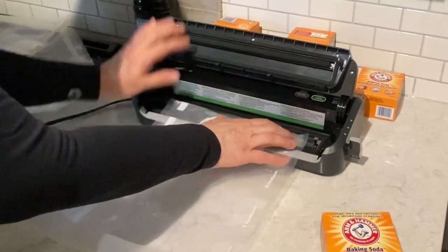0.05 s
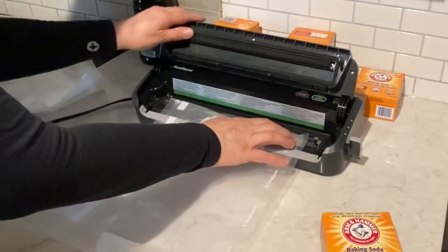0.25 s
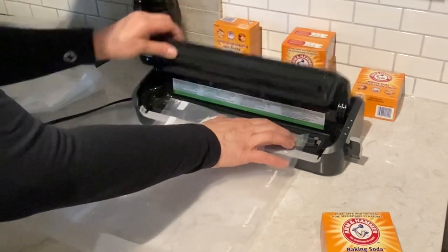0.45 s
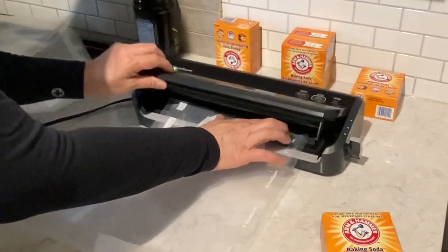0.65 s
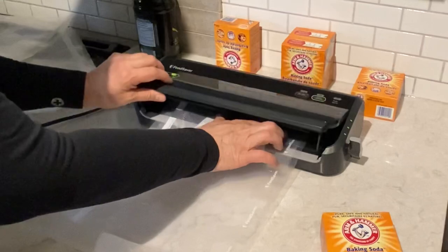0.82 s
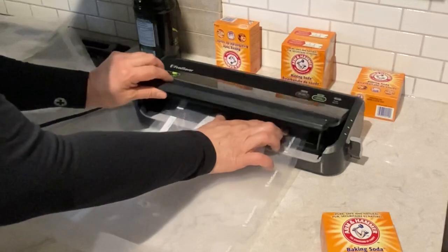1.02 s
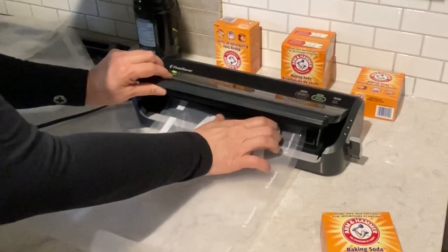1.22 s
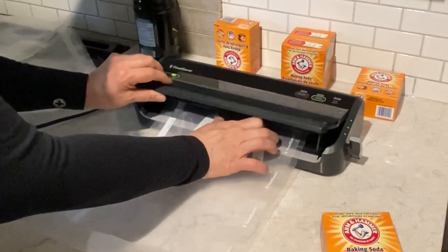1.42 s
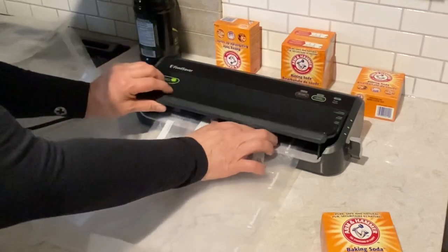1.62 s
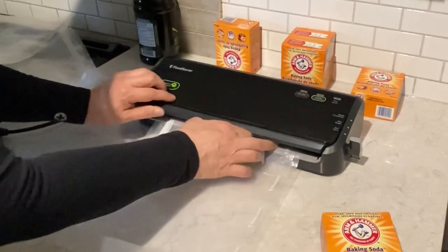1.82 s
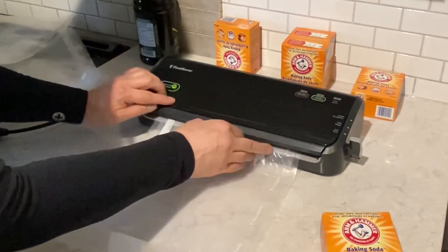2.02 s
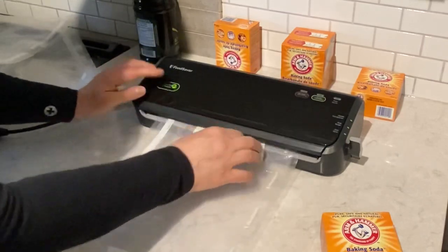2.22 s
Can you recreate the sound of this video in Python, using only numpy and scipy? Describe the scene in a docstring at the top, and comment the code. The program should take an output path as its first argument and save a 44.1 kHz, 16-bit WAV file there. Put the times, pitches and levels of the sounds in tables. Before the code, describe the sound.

A vacuum sealer's plastic lid clatters loose, clicks as it is lowered, then is pressed shut with hollow knocks and scrapes. A plastic bag rustles faintly. Heard close up in a small kitchen with a low appliance hum.

```python
"""A sharp plastic click, then a clatter: a hand knocks loose the open lid of a vacuum sealer.
The lid is lowered, the latches clack, and it is pressed home with scrapes and hollow shell knocks.
Its weight thuds in the housing and booms in the kitchen counter; a plastic bag rustles under the fingers.
An appliance hums in the small tiled room. Two close microphone ports pick it all up."""
import sys
import numpy as np
from scipy import signal
from scipy.fft import rfft, irfft, next_fast_len
from scipy.io import wavfile
from scipy.ndimage import map_coordinates

SR = 44100
rng = np.random.default_rng(int(sys.argv[2]) if len(sys.argv) > 2 else 0)


def wrap_up_sound(samples):
    """Save the sound to the file named by the first command line argument, as 16-bit audio."""
    columns = np.atleast_2d(samples).T
    # keep every value between -1 and 1, then stretch to whole-number steps
    tamed = np.clip(columns, -1, 1)
    steps = np.round(tamed * 32767).astype(np.int16)
    wavfile.write(sys.argv[1], SR, steps)


N = 103635

HUM_PARTIALS = [(119, -56.5), (236, -52), (359.8, -47)]  # appliance: f/Hz, level/dB
AIR_SPECTRUM = [(20, -61), (45, 5.5), (70, 2), (110, 3), (155, -3.5), (220, 6), (300, -7), (450, -11),
                (800, -15), (1500, -24), (3000, -36), (6000, -43), (15000, -48)]  # room noise: f/Hz, level/dB
ROOM_DECAY = [(100, 0.6), (500, 0.25), (2500, 0.26), (7000, 0.19), (14000, 0.13)]  # reverberation: f/Hz, T60/s
ROOM_SPECTRUM = [(60, -11), (250, -4), (700, -1.5), (2500, -1.5), (7000, -4), (14000, -5.5)]  # tail re direct sound: f/Hz, level/dB
ROOM_COHERENCE = [(70, 0.91), (250, 0.81), (500, 0.031), (4000, 0.049), (6500, 0.94), (9000, 1)]  # diffuse sound, left-right: f/Hz, coherence/1
DIRECT_COHERENCE = [(70, 0.97), (250, 0.88), (1000, 1), (3000, 0.66), (6000, 0), (9000, 0.99)]  # direct sound, left-right: f/Hz, coherence/1
PORT_LEAD = [(4500, 0), (5500, -1), (6900, .5), (8300, 2.7), (9200, 3.14), (10100, 3.5), (11500, 6),
             (13200, 6.5), (14900, 9.3)]  # left port ahead of right: f/Hz, phase/rad

SHUDDER_SWELLS = [(.26, 0.033, -28), (.38, 0.076, -42), (2.04, 0.14, -37.5)]  # counter rumble: centre t/s, half width/s, level/dB
SHUDDER_SPECTRUM = [(20, -9), (45, 11.5), (72, -7), (110, -38), (250, -41.5)]  # counter rumble: f/Hz, level/dB
RUSTLE_ENVELOPE = [(.14, -72.5), (.19, -47.5), (.3, -73), (0.471, -74), (0.5, -42), (0.6, -96), (.96, -70),
                   (1.08, -64.5), (1.389, -60.5), (1.46, -51.5), (1.56, -44), (1.689, -53), (1.789, -45.5),
                   (1.92, -44), (2.0, -55.5), (2.089, -41.5), (2.199, -66.5), (2.24, -58), (2.35, -57)]  # bag handling: t/s, level/dB
CREASE_SNAPS = [(1.072, -41), (1.145, -48), (1.171, -34), (1.1967, -24.5), (1.2209, -35), (2.096, -29.5)]  # creases flipping: t/s, level/dB
FILM_SPECTRUM = [(500, -46), (2000, 8), (5000, 3.5), (8000, 4.5), (12000, 3), (15000, 3)]  # bag film: f/Hz, level/dB
SCRAPE_SWELLS = [(0.175, 0.011, -35), (0.222, 0.021, -34), (0.258, 0.011, -34), (0.363, 0.1, -52.5),
                 (.478, 0.0044, -43), (.51, 0.021, -40), (0.93, 0.04, -56.5), (1.1, 0.0094, -38.5),
                 (1.2, 0.026, -40.5), (1.45, 0.016, -36.5), (1.559, 0.069, -41.5), (1.635, 0.02, -41.5),
                 (1.785, 0.054, -31), (1.893, 0.022, -38.5), (1.929, 0.0052, -30), (2.081, 0.046, -42),
                 (2.147, 0.02, -44)]  # sliding strokes: centre t/s, half width/s, level/dB
SCRAPE_SPECTRUM = [(200, -2.5), (450, 3), (720, 7), (1000, 1.5), (1500, -4.5), (2200, -12), (5000, -26),
                   (15000, -37)]  # rubbed hollow plastic: f/Hz, level/dB

LANDINGS = [(.204, -15.5, -18), (0.227, -25, -24.5), (0.2843, -20.5, -12.5), (0.623, -50, -24.5),
            (0.844, -36, -29), (1.432, -36.5, -22.5), (1.724, -32, -19), (1.803, -27, -14.5),
            (1.938, -28.5, -18)]  # weight on the machine: t/s, counter level/dB, housing level/dB
COUNTER_MODES = [(47.73, -13, 1), (67.4, -3, 0.44), (114, 1.5, 0.21)]  # counter boom: f/Hz, level/dB, T60/s
HOUSING_MODES = [(218, -3, 0.076), (224.8, -4, 0.13), (276.3, -12, 0.19), (347.4, -1, 0.05),
                 (515, -6.5, 0.04)]  # housing thud: f/Hz, level/dB, T60/s
SHELL_HITS = [(.202, .005, -17, 635), (.229, 0.0012, -23.5, 543), (.282, 0.0019, -21, 504),
              (.305, 0.0015, -25, 544), (.618, 0.002, -37, 694), (.911, 0.00083, -40, 780),
              (1.0127, 0.00052, -18.5, 763), (1.744, 0.0056, -19, 550), (1.784, 0.0046, -13.5, 620),
              (1.856, 0.0032, -23, 710), (1.9338, 0.0014, -11.5, 578), (2.058, 0.0012, -26, 647)]  # hollow knocks: t/s, rise/s, level/dB, pitch f/Hz
SHELL_MODES = [(508, -1), (560, -2.5), (610, 4.5), (690, 2), (745, -0.5), (835, -1.5), (1075, -2)]  # plastic shell: f/Hz, level/dB
# lid hitting base: t/s, rise/s, latch level/dB, crack level/dB, crack cutoff f/Hz, latch pitch f/Hz
LID_CONTACTS = [ (0.0118, 0.0003, -34, -32, 7600, 1240), (.208, 0.0072, -26.5, -26, 3130, 2650),
                (.231, 0.0026, -28, -27, 2200, 2190), (.281, 0.00087, -24.5, -17, 5040, 1700),
                (.305, 0.00199, -27.5, -24, 5800, 2380), (0.532, 0.0013, -42.5, -38.5, 6970, 2240),
                (.618, 0.0012, -45, -40.5, 2600, 3000), (0.838, 0.0011, -52, -60, 4000, 3170),
                (0.854, 0.00063, -44.5, -65, 4030, 2660), (0.9886, 0.0013, -31, -33.5, 7800, 2070),
                (1.0118, 0.00068, -24, -20, 7900, 1190), (1.238, 0.00066, -18.5, -19.5, 13500, 2520),
                (1.4281, 0.0009, -52, -33.5, 2480, 2000), (1.6185, 0.00085, -24.5, -40, 2200, 1460),
                (1.7182, 0.00072, -29, -26.5, 3000, 1290), (1.764, 0.0018, -41, -30.5, 3200, 1400),
                (1.785, 0.0054, -35, -25, 5030, 1700), (1.794, 0.0017, -19, -20, 6050, 1410),
                (1.861, 0.0027, -22.5, -25, 3760, 1600), (1.934, 0.0012, -22.5, -24.5, 6700, 1680),
                (2.058, 0.00079, -36, -43, 3020, 1420)]
LATCH_MODES = [(1110, 8.5), (1310, 0.5), (1480, 1.5), (1700, 0), (1950, -4), (2340, -4.5), (2650, -1.5),
               (2910, -8.5), (3450, -7), (4610, -7.5), (7100, -14)]  # plastic latch: f/Hz, level/dB
CRACK_SPECTRUM = [(50, -35), (500, 5.5), (1500, -3), (3500, -4.5), (7000, -4.5), (14000, -1)]  # contact noise: f/Hz, level/dB


def amp(db):
    """Decibels to gain."""
    return 10 ** (np.asarray(db) / 20)


def unit(x):
    """Scale to rms 1."""
    return x / np.sqrt(np.mean(x ** 2) + 1e-20)


def along(points, hz):
    """Interpolate (f/Hz, value) points on a log axis."""
    f, v = np.transpose(points)
    return np.interp(np.log(hz + 1), np.log(f + 1), v)


def wobble(knots_per_s):
    """Smooth random curve."""
    knots = rng.standard_normal(int(N * knots_per_s / SR) + 4)
    return map_coordinates(knots, [np.arange(N) * knots_per_s / SR])


def swells(rows):
    """Gain curve of Gaussian bumps."""
    t = np.arange(N) / SR
    return sum(amp(db) * np.exp(-((t - centre_s) / half_s) ** 2) for centre_s, half_s, db in rows)


def filtered(x, response):
    """Apply a frequency response."""
    n = x.shape[-1]
    padded = next_fast_len(n + 8192)
    return irfft(rfft(x, padded) * response(np.fft.rfftfreq(padded, 1 / SR)), padded)[..., :n]


def coloured(x, spectrum):
    """Shape by a spectrum, at rms 1."""
    return unit(filtered(x, lambda hz: amp(along(spectrum, hz))))


def spread(pair, coherence):
    """Mix two unrelated signals to left and right of given coherence."""
    angle = lambda hz: np.arccos(np.clip(along(coherence, hz), -1, 1)) / 2
    mid, side = filtered(pair, lambda hz: np.array([np.cos(angle(hz)), np.sin(angle(hz))]))
    return np.array([mid + side, mid - side])


def add(track, at_s, sound):
    """Mix a sound in, cropped to the track."""
    start = round(at_s * SR)
    part = track[:, max(start, 0):max(start + sound.shape[1], 0)]
    part += sound[:, max(-start, 0):][:, :part.shape[1]]


def grains(per_s, scatter_db):
    """Random impulses of uneven size: tiny slips."""
    chance, size = rng.random(N), rng.standard_normal(N)
    return (chance < per_s / SR) * amp(scatter_db * np.minimum(size, 2)) * rng.choice([-1, 1], (2, N))


def struck(modes, pitch_hz, db_per_octave, t60_s):
    """Modes far from the struck pitch ring less."""
    return [(hz, db - db_per_octave * abs(np.log2(hz / pitch_hz)), t60_s) for hz, db in modes]


def ring(modes, t, rise_s, blur_hz, scatter_db=1):
    """Damped, wavering modes, in phase at t = 0; returns a quadrature pair."""
    hz, db, t60_s = np.transpose(modes)[:, :, None]
    age_s = np.maximum(t, 0)
    steps = rng.standard_normal((len(hz), len(t))) * (t > 0)
    phase = 2 * np.pi * hz * age_s + np.cumsum(steps, axis=1) * np.sqrt(2 * np.pi * blur_hz / SR)
    gain = amp(db + scatter_db * rng.standard_normal(db.shape)) / np.sqrt(np.sum(amp(db) ** 2) / 2)
    ringing = np.sum(gain * np.exp(1j * phase - np.log(1000) * age_s / t60_s), axis=0)
    return np.array([ringing.imag, ringing.real]) * (1 - np.exp(-age_s / rise_s))


def room_air(level_db=-45):
    """Low, diffuse noise of the still kitchen."""
    return amp(level_db) * spread(coloured(rng.standard_normal((2, N)), AIR_SPECTRUM), ROOM_COHERENCE)


def appliance_hum():
    """Hum partials drifting in phase, slightly louder on the right."""
    t = np.arange(N) / SR
    hum = sum(np.sqrt(2) * amp(db) * np.sin(2 * np.pi * hz * t + wobble(5.32)) for hz, db in HUM_PARTIALS)
    return hum * amp([[-1], [1]])


def room_tail(x, build_s=0.0013, block=SR // 5):
    """Tile reflections: a short noise tail, new for each block."""
    out = np.zeros((2, N))
    for start in range(0, N, block):
        hz, t, noise = signal.stft(rng.standard_normal((2, SR // 2)), SR, nperseg=256)
        decay = np.exp(-np.log(1000) * t / along(ROOM_DECAY, hz)[:, None]) * (1 - np.exp(-t / build_s))
        decay /= np.linalg.norm(decay, axis=1, keepdims=True)
        tail = signal.istft(noise * decay, SR, nperseg=256)[1]
        tail /= np.linalg.norm(tail[0])
        add(out, start / SR, signal.fftconvolve(x[None, start:start + block], tail, axes=1))
    return spread(filtered(out, lambda hz: amp(along(ROOM_SPECTRUM, hz))), ROOM_COHERENCE)


def counter_shudder():
    """The counter rumbles under the rocking machine and leaning hands; mono."""
    return swells(SHUDDER_SWELLS) * coloured(rng.standard_normal(N), SHUDDER_SPECTRUM)


def bag_rustle(crinkle_db=-8.5):
    """Thin film hisses and crinkles as it is moved."""
    level_db = np.interp(np.arange(N) / SR, *np.transpose(RUSTLE_ENVELOPE))
    hiss = rng.standard_normal((2, N))
    crinkles = amp(crinkle_db) * unit(grains(per_s=360, scatter_db=-12))
    flutter_db = 2.2 * wobble(90) + wobble(12)
    return amp(level_db + flutter_db) * coloured(hiss + crinkles, FILM_SPECTRUM)


def bag_snaps(t60_s=0.028):
    """Creases flip with a sharp tick."""
    out, t = np.zeros((2, N)), np.arange(SR // 20) / SR
    decay = np.exp(-np.log(1000) * t / t60_s)
    for at_s, db in CREASE_SNAPS:
        add(out, at_s, amp(db) * decay * coloured(rng.standard_normal((2, len(t))), FILM_SPECTRUM))
    return out


def lid_scrapes():
    """Lid and fingers slide over hollow plastic: dense slips swell with each stroke."""
    return swells(SCRAPE_SWELLS) * coloured(grains(per_s=2800, scatter_db=-2.5), SCRAPE_SPECTRUM)


def lid_thumps(rise_s=0.0023, blur_hz=3):
    """The lid's weight booms in the counter and thuds in the housing."""
    out, t = np.zeros((2, N)), np.arange(SR // 2) / SR
    for at_s, boom_db, thud_db in LANDINGS:
        boom = amp(boom_db) * ring(COUNTER_MODES, t, rise_s, blur_hz)
        thud = amp(thud_db) * ring(HOUSING_MODES, t, rise_s, blur_hz)
        add(out, at_s, boom + thud)
    return out


def shell_knocks():
    """Short hollow notes, pitched by where the shell is hit; loose plastic makes the modes waver."""
    out, t = np.zeros((2, N)), np.arange(SR // 5) / SR
    for at_s, rise_s, db, pitch_hz in SHELL_HITS:
        modes = struck(SHELL_MODES, pitch_hz, db_per_octave=29, t60_s=0.052)
        add(out, at_s, amp(db) * ring(modes, t, rise_s, blur_hz=9.1))
    return out


def latch_clacks(crack_t60_s=0.028):
    """Each contact cracks and rings one region of the latch; soft contacts are dull."""
    out, t = np.zeros((2, N)), np.arange(-SR // 50, SR // 6) / SR
    for at_s, rise_s, latch_db, crack_db, cutoff_hz, pitch_hz in LID_CONTACTS:
        response = lambda hz: amp(along(CRACK_SPECTRUM, hz)) / np.hypot(1, (hz / cutoff_hz) ** 2)
        envelope = np.exp(np.minimum(t, 0) / rise_s - np.log(1000) * np.maximum(t, 0) / crack_t60_s)
        crack = envelope * unit(filtered(rng.standard_normal((2, len(t))), response))
        modes = struck(LATCH_MODES, pitch_hz, db_per_octave=10.5, t60_s=0.042)
        latch = ring(modes, t + rise_s / 2, rise_s, blur_hz=70)
        add(out, at_s + t[0], amp(crack_db) * crack + amp(latch_db) * latch)
    return out


def scene():
    """Sealer and bag with their room tail, over rumble, hum and air."""
    close = latch_clacks() + shell_knocks() + lid_thumps() + lid_scrapes() + bag_rustle() + bag_snaps()
    in_room = spread(close, DIRECT_COHERENCE) + room_tail(close[0])
    return in_room + counter_shudder() + appliance_hum() + room_air()


def record(dry, low_cut_hz=40, treble_edge_hz=14800, top_hz=15700):
    """Treble phase shifts between the two ports; deepest bass and top cut."""
    half_lead_rad = lambda hz: np.interp(hz, *np.transpose(PORT_LEAD)) * np.array([[0.5], [-0.5]])
    lowpass = lambda hz: (hz < top_hz) / np.hypot(1, (hz / treble_edge_hz) ** 20)
    highpassed = signal.sosfilt(signal.butter(3, low_cut_hz, "highpass", fs=SR, output="sos"), dry)
    return filtered(highpassed, lambda hz: np.exp(1j * half_lead_rad(hz)) * lowpass(hz))


dry = scene()
out = record(dry)
wrap_up_sound(out)
```